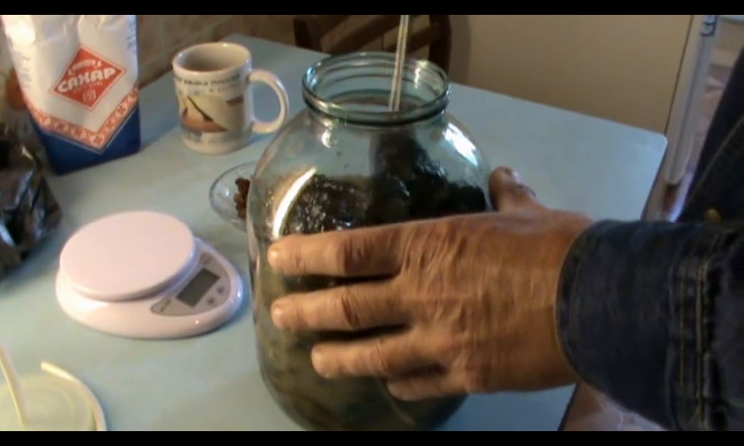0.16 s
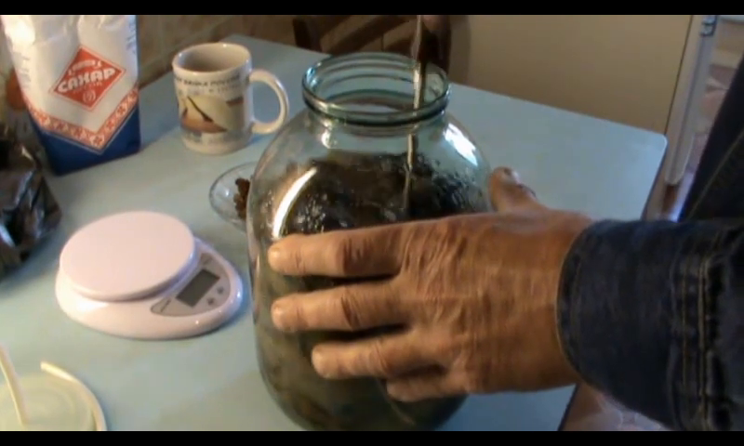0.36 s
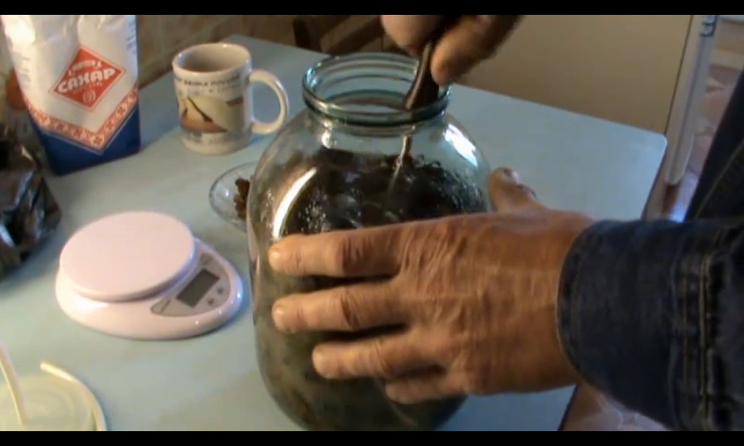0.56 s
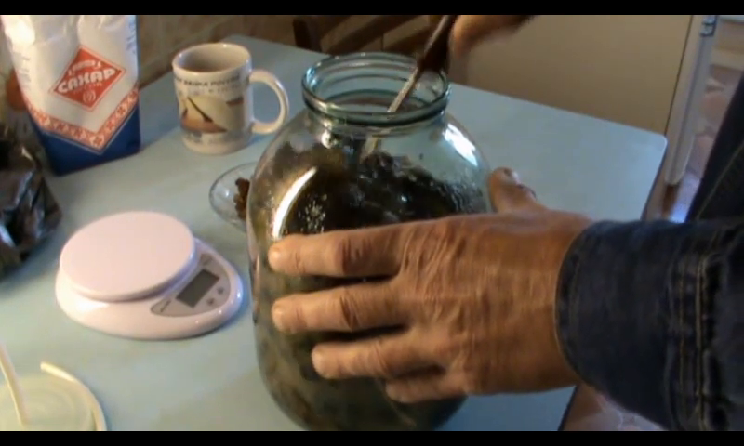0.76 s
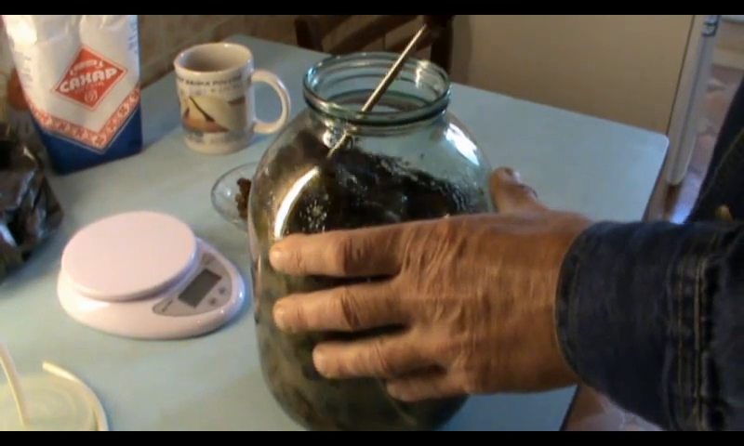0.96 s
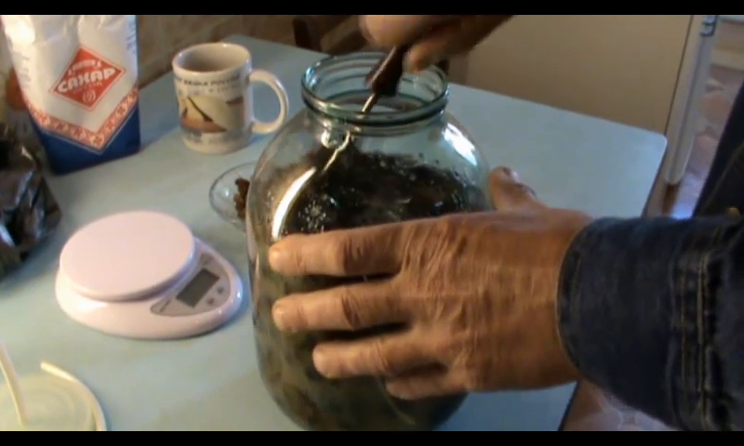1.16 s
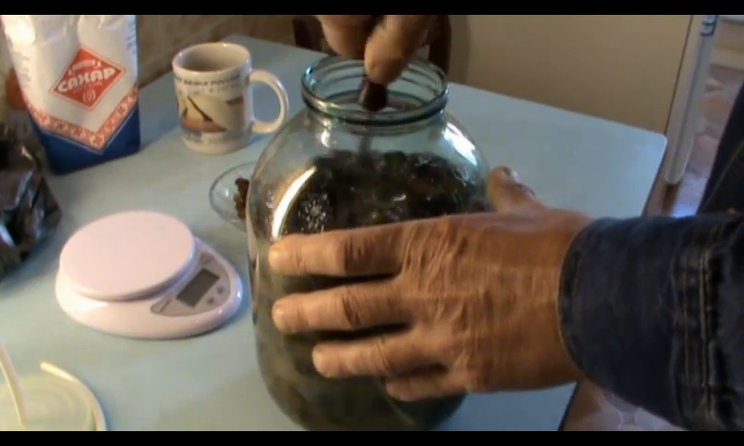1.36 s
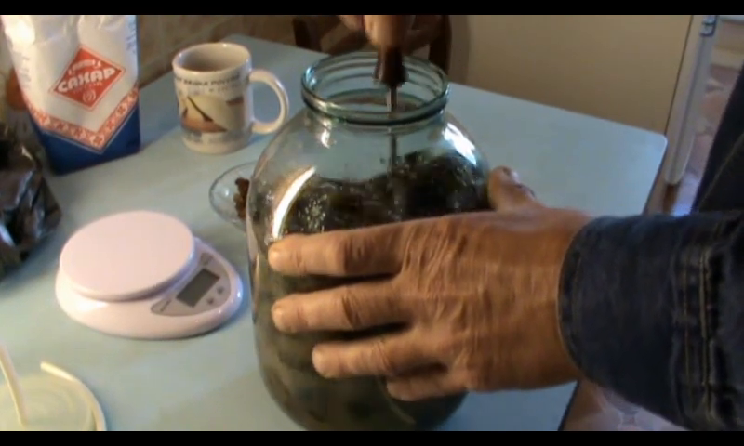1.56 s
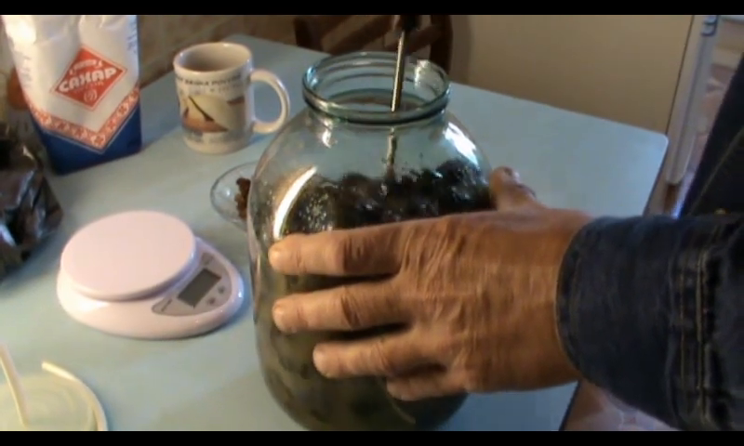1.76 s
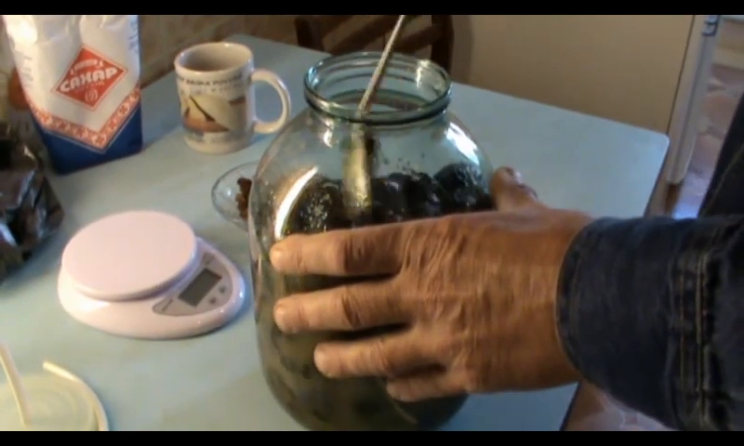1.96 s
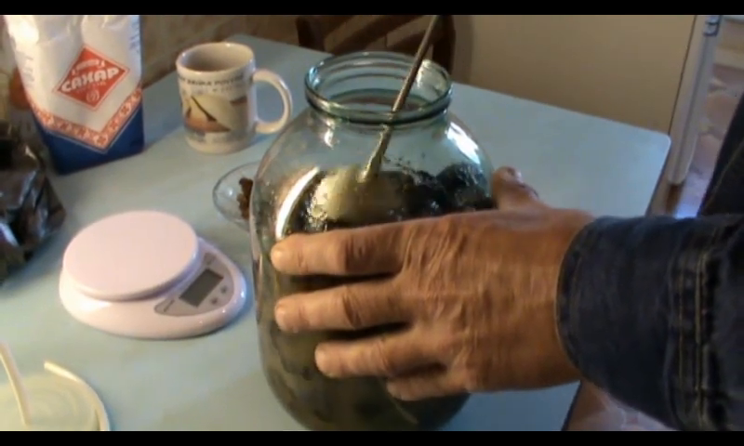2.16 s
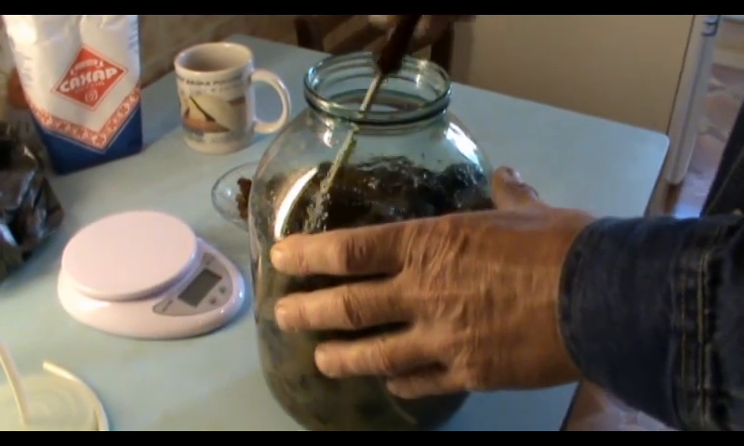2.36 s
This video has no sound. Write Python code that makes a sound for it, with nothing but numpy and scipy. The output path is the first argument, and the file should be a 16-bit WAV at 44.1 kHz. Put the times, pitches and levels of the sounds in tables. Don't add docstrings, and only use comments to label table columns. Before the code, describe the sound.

Close in a small kitchen, a spoon strikes a heavy filled glass jar: sharp double clank first, then muffled knocks, tiny wet ticks and a short scrape, over soft fruit squelching, a faint clock and quiet hiss.

```python
import sys
import numpy as np
from scipy import signal
from scipy.fft import rfft, irfft
from scipy.io import wavfile

SR = 44100
rng = np.random.default_rng(int(sys.argv[2]) if len(sys.argv) > 2 else 0)


def boost(x):
    u = np.asarray(x, float) / 20
    return 10 ** u


def bounce(signal):
    frames = np.transpose(np.atleast_2d(signal))
    limited = np.clip(frames, -1, 1)
    pcm = np.round(limited * 32767).astype(np.int16)
    wavfile.write(sys.argv[1], SR, pcm)


N = 105840

# frequency in Hz, level in dB per Hz.
FLOOR_COLOUR = [(25, 1.5), (50, -12.5), (75, -16), (150, -5.5), (245, -12.5), (480, -6.5), (1100, -16),
                (16000, -26)]
# frequency in Hz, likeness (1 = same).
FLOOR_LIKENESS = [(100, 1), (1000, 0.25), (5000, 0.29), (14000, 0.9)]
FLOOR_DB = -57

# frequency in Hz, level in dB per Hz.
CLOCK_COLOUR = [(530, -42), (900, -9), (1160, 3), (1310, -10), (2180, -12), (2470, -6), (5210, -9),
                (6950, -3), (14000, -21.5)]
# frequency in Hz, level in dB.
CLOCK_RINGS = [(1310, -27), (3200, -32), (7000, -30.5), (10200, -29.5)]
CLOCK_FIRST_S, CLOCK_PERIOD_S, CLOCK_DB = 0.1736, 1, -44
CLOCK_RISE_S, CLOCK_T60_S, CLOCK_RING_T60_S = 0.004, 0.37, 0.02

# time in seconds, level in dB.
STIR = [
    (0, -58.5),
    (.6, -53.5),
    (0.898, -65.5),
    (1.15, -57),
    (1.45, -63),
    (1.62, -65),
    (1.95, -67),
    (2.1, -68),
    (2.4, -62.5),
]
# frequency in Hz, level in dB per Hz.
SLOSH = [(260, -12), (360, 7), (485, 5.5), (700, -12), (1100, -20), (1600, 2), (2400, -5), (4000, -13)]

# frequency in Hz, level in dB, decay to -60 dB in seconds.
TABLE_MODES = [(43.8, -22, 0.52), (104.7, -17.5, 0.52), (134.2, -4.5, 0.21), (152.7, 4, 0.14),
               (180.6, 0, 0.36)]
# start in seconds, level in dB.
THUDS = [
    (0.018, -53),
    (0.24, -45),
    (0.415, -31.5),
    (0.649, -47.5),
    (0.765, -59),
    (1.292, -45),
    (1.47, -59.5),
    (1.643, -42),
]
# start in seconds, level in dB.
SWAYS = [
    (0.032, -46),
    (.33, -54),
    (.76, -50.5),
    (1.419, -56),
    (1.72, -55),
    (2.29, -63),
]
THUD_S, THUD_ROOM_DB, TABLE_PAN_DB = 0.0026, -7.5, -1
SWAY_HZ, SWAY_T60_S, SWAY_RISE_S = 90.7, 0.47, 0.016

TICK_TIMES = [.705, .862, .957, .958, 1.391, 1.431, 1.563, 1.59, 1.63, 1.677, 1.679, 1.696, 1.711, 2.053,
              2.148, 2.376, 2.377]
# level in dB, pitch in Hz, share sent to the room in dB.
TICKS = [(-44, 9996, -3), (-41.5, 4591, -2), (-33.5, 11494, -3), (-39, 8796, -1), (-41.5, 3214, 2),
         (-43.5, 9005, -1), (-49, 1297, 3), (-51, 1598, 13), (-32, 1333, 1), (-35, 4802, -9),
         (-28, 6200, -0.5), (-39, 9300, -9), (-58, 9000, -3), (-42.5, 8302, -19), (-43, 1902, -7),
         (-41, 3298, 3), (-46, 2396, -5)]
TICK_CYCLES, TICK_T60_S = 28, 0.025

# frequency in Hz, level in dB.
NECK = [(840, -12.5), (1390, -8), (1490, -4.5), (1744, 5.5), (1810, 3.5), (1860, 5.5), (2175, -1),
        (2420, -14), (2690, -1), (2740, 3.5), (3250, -1.5), (4204, -28), (5943, -41)]
SHOULDER = [(590, 2), (760, -18), (1110, 5.5), (1220, -5), (1310, 6), (1580, -7.5), (1740, 5), (2000, -1.5),
            (2260, 0), (2700, 2.5), (3450, 5.5), (4100, -14), (5140, -9)]
REBOUND = [(640, 5.5), (1100, -16.5), (1600, 5), (2165, 8), (2700, -2), (3120, 11), (3630, -5), (5800, -32)]
DROWNED = [(670, -3), (1280, -3.5), (1560, 4), (1790, 0), (974, -11), (2420, 7), (2640, 2), (2990, 9),
           (3430, 10), (4020, 0), (4960, -3.5), (7600, -2.5)]
LOW_WALL = [(1290, 1), (1530, 5), (1610, 6), (1740, 2), (2200, 1), (3100, -1), (3600, -18), (4700, -32)]
GRAZE = [(700, -0.5), (1000, -1), (1394, 12.5), (1620, 1), (2143, 1), (3200, 1.5), (6100, 5)]
RIM = [(640, -20), (810, -2.5), (1200, -5.5), (2200, 4.5), (3270, 8.5), (5700, -20)]
FRUIT = [(175, -10), (290, 2), (343, 2.5), (395, -2), (460, 1.5), (700, 6), (1110, 6.5), (1340, 2),
         (1625, 4.5)]
# frequency in Hz, level in dB.
SCRAPED = [(950, 2.5), (1200, -4), (1550, -7), (2100, -7), (2900, -2.5), (3300, 1), (5500, 0), (6300, 1)]
NECK_CYCLES, WALL_CYCLES, DROWNED_CYCLES, LOW_WALL_CYCLES, FRUIT_CYCLES = 58, 38.8, 53, 57, 32.6
NECK_ROOM_DB, OPEN_ROOM_DB, REBOUND_ROOM_DB, DROWNED_ROOM_DB, DEEP_ROOM_DB = -1, 0.94, -7, -10, -6.5

# frequency in Hz, decay to -60 dB in seconds.
BELLY = [(288, 0.087), (334, 0.052), (420, 0.037), (484, 0.096), (544, 0.066), (583, 0.014), (629, 0.027)]
# one place, level in dB per belly mode.
BELLY_SHARES = [
    (-7, -5.5, 3, 5.5, 4.5, -5, 6),
    (-9, 3, 7.5, 6, 9, -2, -8.5),
    (-2.5, -4, 4, -12, 11.5, 13.5, 12),
    (-23, 3, -3, 4, 1.5, 18, 11),
    (-3.5, -1.5, 2.5, 3, 0, -20, 8.5),
    (-7, -9, -19, 4, 10.5, 8, -9),
    (-3.5, -1, -1, 4.5, -6.5, -6, 6),
    (-15, 11.5, 6, 8.5, 9.5, -12, -9),
]
# ring's rise in seconds, slap to the walls in dB over the glass, its low edge in Hz.
CONTACT = [
    (0.0012, 2, 1800),
    (0.00074, 1, 700),
    (0.0028, 2, 1070),
    (0.00034, 9.5, 580),
    (0.00013, 2.5, 480),
    (0.0026, 2, 530),
    (0.00046, 7, 410),
    (0.00078, 6.5, 200),
]
# frequency in Hz, level in dB, decay to -60 dB in seconds.
SPOON = [(5940, -37, 0.021), (7370, -5.5, 0.024), (8880, 1, 0.028), (9180, -27, 0.0096), (10750, -6, 0.014),
         (12200, -24, .01)]
SLAP_HIGH_HZ, SOFT_HZ, BELLY_RISE_S, SPOON_RISE_S, JAR_CUT_HZ = 4220, 850, 0.0015, 0.00036, 59
CRACK_T60_S, CRACK_CUT_HZ, CRACK_ROOM_DB, SPOON_ROOM_DB = 0.014, 9400, 5, -8
JAR_PAN_DB, SPOON_PAN_DB = -0.5, 0.6

# start in seconds, glass level in dB, belly in dB, spoon in dB, crack in dB.
NECK_HITS = [
    (0.2395, -12, -28.5, -39, -0.5),
    (.267, -30, -72, -50, -28),
    (0.3222, -28, -68, -60, -47),
    (0.3446, -37, -49, -64, -45),
]
SHOULDER_HITS = [
    (.4158, -15.5, -20.5, -19.5, -7),
    (0.428, -43.5, -33.5, -68, -51),
]
REBOUND_HITS = [
    (.4393, -12.5, -33, -19, -14),
    (.446, -32, -24, -50, -45),
    (.686, -51, -72, -60, -37),
    (.725, -45, -41.5, -60, -44),
]
DROWNED_HITS = [
    (1.289, -32.5, -38, -53, -28),
    (2.146, -63, -57, -80, -36.5),
]
LOW_WALL_HITS = [
    (1.513, -59, -81, -77, -68),
    (1.6384, -30.5, -32, -35.5, -18.5),
]
GRAZE_HITS = [
    (1.789, -37.5, -53.5, -46.5, -50),
    (1.8225, -44.5, -55, -58, -53),
    (1.8355, -46, -67, -53, -48),
    (1.8445, -52, -64, -59, -46),
    (1.862, -55, -53, -81, -80),
]
RIM_HITS = [
    (.001, -39.5, -31, -52, -16),
    (.005, -75, -65, -44, -19.5),
    (.011, -34.5, -99, -64, -56),
]
FRUIT_HITS = [
    (.645, -45.5, -43.5, -56, -47),
    (.763, -41.5, -80, -58, -37),
    (.775, -57, -69, -49, -70),
]
SCRAPE_S, SCRAPE_LENGTH_S, SCRAPE_PER_S = 1.817, 0.032, 2500
SCRAPE_GLASS_DB, SCRAPE_SPOON_DB, SCRAPE_CRACK_DB = -57.5, -63.5, -53

# frequency in Hz, decay to -60 dB in seconds.
ROOM_T60 = [(100, 0.3), (500, 0.31), (1700, 0.38), (3000, 0.3), (6000, 0.44), (14000, 0.26)]
# frequency in Hz, level in dB.
ROOM_COLOUR = [(100, 6), (500, 4), (2000, 4), (6000, -2.5), (14000, -4.5)]
# frequency in Hz, likeness (1 = same).
ROOM_LIKENESS = [(100, 1), (500, 0.97), (2000, 0.36), (6000, 0.32), (14000, .85)]
ROOM_DB, ROOM_GAP_S, ROOM_RISE_S = -4.5, 0.003, 0.0013

# frequency in Hz, left's lead in radians.
LEAD = [(100, -.55), (600, -.9), (1120, -.1), (2070, .3), (8000, .35), (12000, 0)]
# frequency in Hz, left over right in dB.
TILT = [(60, 1.5), (150, 3), (380, .5), (700, -1.5), (2380, -1), (4400, 0), (8120, 1), (15000, .3)]
TOP = 0.8


def rms_one(x):
    return x / np.sqrt(np.mean(x ** 2) + 1e-20)


def at_hz(points, hz):
    table_hz, values = np.array(points)[:, 0], np.array(points)[:, 1]
    return np.interp(np.log(hz), np.log(table_hz), values)


def train(s, db):
    out = np.zeros(N)
    places = np.clip((np.array(s) * SR).astype(int), 0, N - 1)
    np.add.at(out, places, boost(np.array(db)))
    return out


def band_pass(x, order, low_hz, high_hz):
    return signal.sosfilt(signal.butter(order, [low_hz, high_hz], "band", fs=SR, output="sos"), x)


def ring(clicks, hz, t60):
    r = boost(-60 / (max(t60, .001) * SR))
    w = 2 * np.pi * hz / SR
    return signal.lfilter([0, np.sin(w)], [1, -2 * r * np.cos(w), r * r], clicks + 1e-18)


def swell(clicks, hz, t60, rise):
    return ring(clicks, hz, t60) - ring(clicks, hz, min(rise * np.log(1000), t60 / 2))


def burst(clicks, t60):
    grain = rng.standard_normal(800) * boost(-60 * np.arange(800) / SR / max(t60, .001))
    return signal.fftconvolve(clicks, grain / np.sqrt(np.sum(grain ** 2)))[:N]


def bands(size, likeness):
    white = rng.standard_normal((2, 2, size + 4000))
    edges = 24 * 2 ** np.arange(0, 9.6, .5)
    for k, (low, high) in enumerate(zip(edges, edges[1:])):
        mid, side = band_pass(white[k % 2], 2, low, high)[:, 4000:]
        hz = np.sqrt(low * high)
        alike = np.clip(at_hz(likeness, hz), -1, 1)
        yield hz, np.sqrt(1 + alike) * mid + np.sqrt(1 - alike) * side * [[1], [-1]]


def floor():
    noise = sum(boost(at_hz(FLOOR_COLOUR, hz)) * band for hz, band in bands(N, FLOOR_LIKENESS))
    return boost(FLOOR_DB) * rms_one(noise)


def clock():
    since = (np.arange(N) / SR - CLOCK_FIRST_S) % CLOCK_PERIOD_S
    envelope = (1 - np.exp(-since / CLOCK_RISE_S)) ** 2 * boost(-60 * since / CLOCK_T60_S)
    noise = sum(boost(at_hz(CLOCK_COLOUR, hz)) * band for hz, band in bands(N, FLOOR_LIKENESS) if hz > 800)
    white = rng.standard_normal(N)
    case = sum(boost(db) * ring(white, hz, CLOCK_RING_T60_S) for hz, db in CLOCK_RINGS)
    return boost(CLOCK_DB) * envelope * (rms_one(noise) + case)


def fruit():
    grains = rng.standard_normal((2, N)) * (2.7 + (rng.random(N) < 400 / SR) * 6)
    hz = np.maximum(np.arange(N // 2 + 1) * SR / N, 1)
    coloured = irfft(rfft(grains) * boost(at_hz(SLOSH, hz)) * (hz > 250) * (hz < 5000), N)
    s, db = np.transpose(STIR)
    push = boost(np.interp(np.arange(N) / SR, s, db))
    return push * rms_one(coloured + 0.33 * coloured[::-1])


def table():
    r = np.exp(-2 / (THUD_S * SR))
    push = signal.lfilter([(1 - r) ** 2], [1, -2 * r, r * r], train(*np.transpose(THUDS)) + 1e-18)
    sway = swell(train(*np.transpose(SWAYS)), SWAY_HZ, SWAY_T60_S, SWAY_RISE_S)
    return sway + sum((-1) ** k * boost(db + 12) * ring(push, hz, t60)
                      for k, (hz, db, t60) in enumerate(TABLE_MODES))


def ticks():
    rings = [ring(train([s], [db]), hz, TICK_CYCLES / hz) for s, (db, hz, _) in zip(TICK_TIMES, TICKS)]
    room = sum(boost(room_db) * x for (_, _, room_db), x in zip(TICKS, rings))
    return burst(sum(rings), TICK_T60_S), room


def scrape():
    along = (np.arange(N) / SR - SCRAPE_S) / SCRAPE_LENGTH_S
    slips = (rng.random(N) < SCRAPE_PER_S / SR) * rng.standard_normal(N)
    return slips * (0.53 + along) * (along > 0) * (along < 1)


def glass(clicks, modes, cycles, rise):
    return sum((-1) ** k * boost(db) * swell(clicks, hz, cycles / hz, rise) for k, (hz, db) in enumerate(modes))


def belly(clicks, shares):
    push = signal.lfilter(*signal.butter(1, SOFT_HZ, fs=SR), clicks)
    return sum((-1) ** k * boost(db) * swell(push, hz, t60, BELLY_RISE_S)
               for k, ((hz, t60), db) in enumerate(zip(BELLY, shares)))


def knocks():
    places = [(NECK, NECK_CYCLES, NECK_ROOM_DB, NECK_HITS),
              (SHOULDER, WALL_CYCLES, OPEN_ROOM_DB, SHOULDER_HITS),
              (REBOUND, WALL_CYCLES, REBOUND_ROOM_DB, REBOUND_HITS),
              (DROWNED, DROWNED_CYCLES, DROWNED_ROOM_DB, DROWNED_HITS),
              (LOW_WALL, LOW_WALL_CYCLES, DEEP_ROOM_DB, LOW_WALL_HITS),
              (GRAZE, WALL_CYCLES, DEEP_ROOM_DB, GRAZE_HITS),
              (RIM, WALL_CYCLES, OPEN_ROOM_DB, RIM_HITS),
              (FRUIT, FRUIT_CYCLES, OPEN_ROOM_DB, FRUIT_HITS)]
    drag = scrape()
    scraped = sum(boost(SCRAPE_GLASS_DB + db) * ring(drag, hz, FRUIT_CYCLES / hz) for hz, db in SCRAPED)
    jar = boost([[0], [DEEP_ROOM_DB]]) * scraped
    for (modes, cycles, room_db, hits), shares, contact in zip(places, BELLY_SHARES, CONTACT):
        rise, slap_db, low_hz = contact
        s, glass_db, belly_db = np.transpose(hits)[:3]
        clicks = train(s, glass_db)
        jar = jar + boost([[0], [room_db]]) * glass(clicks, modes, cycles, rise)
        jar = jar + belly(train(s, belly_db), shares)
        jar[1] += boost(slap_db + 21) * band_pass(clicks + 1e-18, 3, low_hz, SLAP_HIGH_HZ)
    jar = signal.sosfilt(signal.butter(2, JAR_CUT_HZ, "high", fs=SR, output="sos"), jar)

    all_hits = sum((hits for *_, hits in places), [])
    s, _, _, spoon_db, crack_db = np.transpose(all_hits)
    crack = train(s, crack_db) + boost(SCRAPE_CRACK_DB) * drag
    crack = np.array([burst(crack, CRACK_T60_S), crack])
    crack = band_pass(crack, 2, 1500, CRACK_CUT_HZ) * 2
    steel = train(s, spoon_db) + boost(SCRAPE_SPOON_DB) * drag
    spoon = sum(boost(db) * swell(steel, hz, t60, SPOON_RISE_S) for hz, db, t60 in SPOON)
    return jar, crack, spoon


def kitchen(x):
    t = np.arange(int(.8 * SR)) / SR
    tail = sum(boost(at_hz(ROOM_COLOUR, hz) - 60 * t / max(at_hz(ROOM_T60, hz), .05)) * band
               for hz, band in bands(len(t), ROOM_LIKENESS))
    tail = tail * (1 - np.exp(-np.maximum(t - ROOM_GAP_S, 0) / ROOM_RISE_S))
    tail = tail / np.sqrt(np.sum(tail ** 2) / 2)
    return boost(ROOM_DB) * signal.fftconvolve(tail, x[None], axes=1)[:, :N]


def ports(x):
    hz = np.maximum(np.arange(N + 1) * SR / (2 * N), 1)
    half = np.array([[.5], [-.5]])
    turned = rfft(x, 2 * N) * np.exp(1j * half * at_hz(LEAD, hz))
    return irfft(turned * boost(half * at_hz(TILT, hz)), 2 * N)[:, :N]


def scene():
    (jar, jar_room), (crack, crack_room), spoon = knocks()
    tick, tick_room = ticks()
    thud = table()
    side = np.array([[1], [-1]])
    near = (jar + crack) * boost(JAR_PAN_DB * side)
    near = near + (spoon + tick) * boost(SPOON_PAN_DB * side)
    near = near + thud * boost(TABLE_PAN_DB * side)
    to_room = jar_room + tick_room + boost(THUD_ROOM_DB) * thud
    to_room = to_room + boost(CRACK_ROOM_DB) * crack_room + boost(SPOON_ROOM_DB) * spoon
    return ports(near + kitchen(to_room)) + clock() + fruit() + floor()


def low_pass(x):
    return signal.sosfilt(signal.butter(12, 16440, fs=SR, output="sos"), x)


def record(dry):
    rounded = TOP * np.tanh(dry / TOP)
    mix = signal.sosfilt(signal.cheby2(10, 50, 16800, fs=SR, output="sos"), rounded)
    return low_pass(mix)


dry = scene()
out = record(dry)
bounce(out)
```